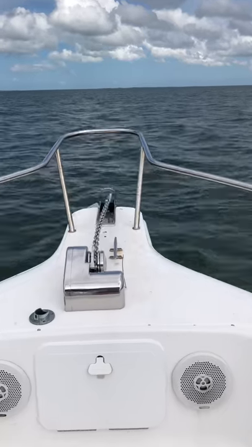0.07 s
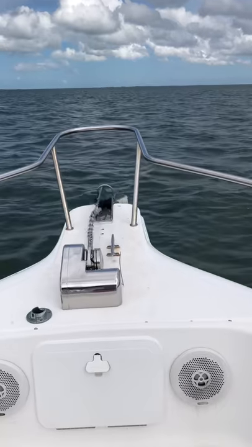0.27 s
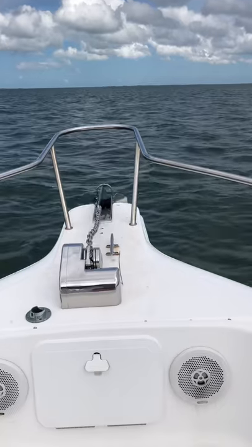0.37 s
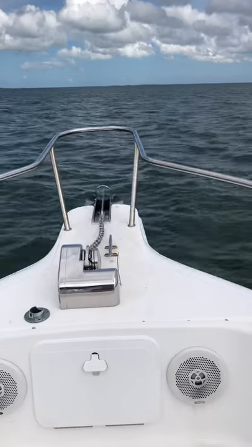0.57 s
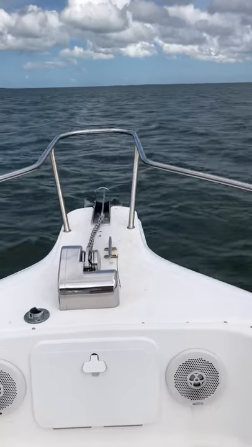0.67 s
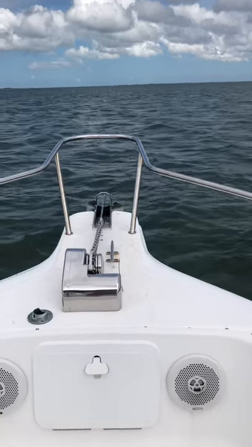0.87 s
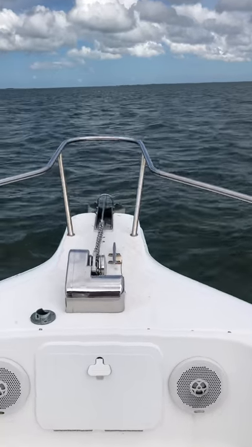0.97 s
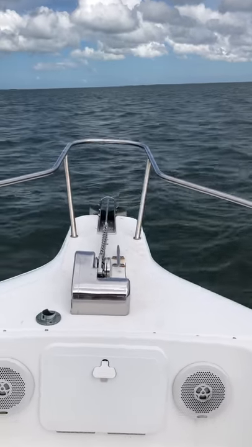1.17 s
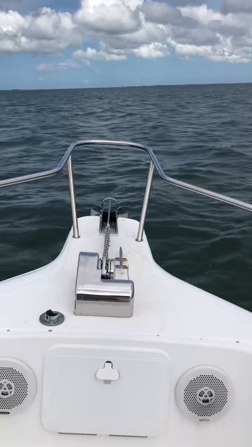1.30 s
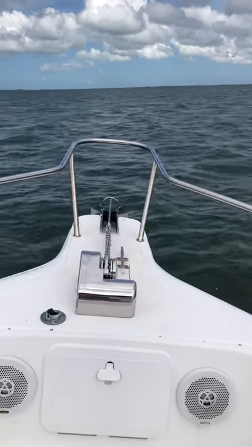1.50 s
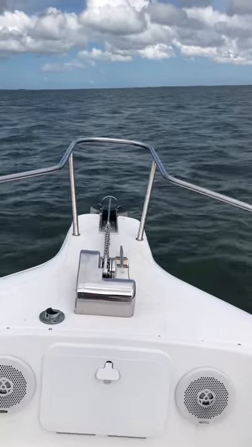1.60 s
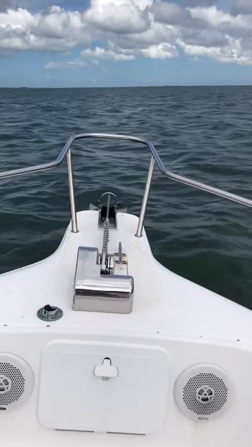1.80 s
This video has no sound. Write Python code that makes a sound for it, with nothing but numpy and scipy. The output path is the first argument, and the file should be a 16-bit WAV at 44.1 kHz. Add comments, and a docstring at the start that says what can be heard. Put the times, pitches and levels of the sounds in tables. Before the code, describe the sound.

An anchor clanks into a small boat's bow roller: its chain grinds and clinks, then it slams home, knocks again and rattles to rest, thudding through the hollow deck. Wind and sea rumble throughout, heard from behind the front deck.

```python
"""On a small boat on open water, an anchor is hauled into the roller at the bow.
Wind and sea rumble throughout. The chain grinds and clinks over the roller; the anchor slams home,
knocks again and rattles into its seat. Each blow clanks in the roller, rings in the anchor's steel
and thuds through the hollow deck, and the whole bow booms under the load."""
import sys
import numpy as np
from scipy import signal
from scipy.io import wavfile

SR = 44100
rng = np.random.default_rng(int(sys.argv[2]) if len(sys.argv) > 2 else 0)


def wav_record(signal):
    """Record a signal, one row per channel, as 16-bit PCM in the file named by sys.argv[1]."""
    frames = np.transpose(np.atleast_2d(signal))
    bounded = np.clip(frames, -1, 1)
    # unit amplitude maps onto the largest positive 16-bit level
    quanta = np.round(bounded * 32767).astype(np.int16)
    wavfile.write(sys.argv[1], SR, quanta)


N = 81585
TIME = np.arange(N) / SR

# blows of the anchor: start_s, clank_db, extra_treble_db, thud_db, ring_db
BLOWS = [(0.018, -35, 12.5, -23, -50), (0.0875, -17, -4, -22.5, -22.5), (0.2887, 4, 1, 3, -1),
         (0.323, -12.5, 10.5, -4, -32), (0.332, -19, 16, 3, -36), (0.365, -28, 16.5, -1, -30),
         (0.606, -30.5, 27, -48, -48), (0.6109, -0.5, 2, 0.5, -10.5), (0.620, -7, 4, -5.5, -41),
         (0.7477, -12.5, -15, -19, -59), (0.7982, -10.5, -12, -7, -28), (0.8365, -5, -3, -3, -14.5),
         (0.848, -8, -5, -17, -34), (0.8787, -5.5, -1, -4, -18), (0.8998, -5.5, -16, -18, -25),
         (0.921, -13.5, -8, -11, -21), (0.9998, -9.5, -4.5, -10, -35), (1.011, -23.5, 4, -26, -39),
         (1.691, -36, 9, -24, -55)]
# notes of the metal roller: pitch_hz, level_db, fade_s (time to die away by 60 dB)
ROLLER_NOTES = [(432, -21.5, 0.095), (647, -23.5, 0.18), (740, -16, 0.04), (917, -23.5, 0.16),
                (1020, -18.5, 0.12), (1158, -6, 0.011), (1220, -27.5, 0.098), (1273, -27, 0.24),
                (1450, -30, 0.032), (1595.5, -24, 0.09), (1725, -16, 0.035), (2506, -29, 0.062),
                (3080, -32, 0.11), (3270, -49, 0.072), (4050, -37, 0.052)]


def from_db(db):
    """Turn decibels into a gain."""
    return 10 ** (np.asarray(db) / 20)


def rms_one(x):
    """Scale a signal to an average power of 1."""
    return x / np.sqrt(np.mean(x ** 2) + 1e-20)


def in_time(rows):
    """Join (time, value) points with straight lines."""
    return np.interp(TIME, *np.transpose(rows))


def at_hz(rows, hz):
    """Read a table's columns at one pitch."""
    pitches, *columns = np.transpose(rows)
    return [np.interp(np.log(hz), np.log(pitches), column) for column in columns]


def drift(rate_hz):
    """A smooth random wander, about 1 in size."""
    r = np.exp(-2 * np.pi * rate_hz / SR)
    return rms_one(signal.lfilter([1], [1, -2 * r, r * r], rng.standard_normal(2 * N))[N:])


def clicks(start_s, level_db):
    """One click for each time and level."""
    out = np.zeros(N)
    np.add.at(out, np.clip(np.atleast_1d(start_s) * SR, 0, N - 1).astype(int), from_db(level_db))
    return out


def fade(x, fade_s):
    """Give each click a tail that drops 60 dB in fade_s."""
    return signal.lfilter([1], [1, -from_db(-60 / (fade_s * SR))], x + 1e-18)


def ring(x, hz, fade_s):
    """Each click starts a pure note that dies away."""
    r = from_db(-60 / (fade_s * SR))
    w = 2 * np.pi * hz / SR
    return signal.lfilter([0, np.sin(w)], [1, -2 * r * np.cos(w), r * r], x + 1e-18)


def tone(pitch_hz):
    """A pure tone that follows a changing pitch."""
    return np.sin(2 * np.pi * np.cumsum(pitch_hz) / SR)


def swell(peak_s, level_db, half_length_s):
    """A smooth rise and fall."""
    return from_db(level_db) * np.exp(-((TIME - peak_s) / half_length_s) ** 2 / 2)


def noise_bands(strength_at):
    """Noise in third-octave bands; strength_at(hz) gives each band's strength over time."""
    edges, out = 22 * 2 ** (np.arange(30) / 3), 0
    for low, high in zip(edges, edges[1:]):
        strength = np.pad(strength_at(np.sqrt(low * high)), (SR // 4, 0), "edge")
        band = signal.butter(2, [low, high], "band", fs=SR, output="sos")
        out = out + signal.sosfilt(band, strength * rng.standard_normal(len(strength)))[-N:]
    return out * np.sqrt(SR / 2)


def struck(notes, start_s, blow_db, scatter_db=3):
    """Every blow rings each of an object's notes with a slightly random strength."""
    out = 0
    for k, (hz, level_db, fade_s) in enumerate(notes):
        hits = clicks(start_s, blow_db + level_db + scatter_db * rng.standard_normal(len(start_s)))
        out = out + (-1) ** k * ring(hits, hz, fade_s)
    return out


def wind_and_sea():
    """Wind and water make a low, gently flickering rumble."""
    # tone of the rumble: pitch_hz, level_db_per_hz
    rumble = [(25, -43.5), (40, -58), (65, -52.5), (95, -50), (150, -56), (300, -60.5), (550, -68.5),
              (1000, -76), (2000, -87.5), (4000, -97), (8000, -105), (15000, -108)]
    # its rise and fall: time_s, level_db
    loudness = [(0, -2), (.5, -1.5), (1.1, -1), (1.4, -1.5), (1.85, -5)]
    level_db, flicker_db = in_time(loudness), 2.5
    return noise_bands(lambda hz: from_db(level_db + at_hz(rumble, hz)[0] + flicker_db * drift(11.4)))


def chain_grind(contacts_per_s=700, contact_s=0.0045, spread_db=3):
    """Many tiny contacts of the chain grind over the roller and set it ringing."""
    # loudness of the running chain: time_s, level_db
    hauling = [(0, -16), (.08, -31.5), (.12, -12.5), (.17, -1), (.25, 0), (.3, -0.5), (.37, -7), (.42, -8),
               (.46, -25), (.58, -21), (.72, -26.5), (.78, -17.5), (.84, 2), (.872, -9), (.93, -2.5),
               (.955, -17), (1.0, -29), (1.1, -45), (1.85, -35)]
    # tone of the grinding: pitch_hz, level_db_per_hz
    grinding = [(150, -48.5), (430, -59.5), (560, -59.5), (900, -53.5), (1450, -67), (2000, -62.5),
                (2700, -67), (4000, -74.5), (7000, -92.5), (16000, -106)]
    haul = from_db(in_time(hauling))
    sizes = from_db(spread_db * np.minimum(rng.exponential(1, N), 4))
    contacts = sizes * (rng.random(N) < contacts_per_s / SR)
    knocks = haul * contacts * rng.choice([-1, 1], N)
    roughness = haul * rms_one(np.sqrt(fade(contacts ** 2, contact_s * np.log(1000) / 2)))
    grind = noise_bands(lambda hz: from_db(at_hz(grinding, hz)[0]) * roughness)
    ringing = sum((-1) ** k * from_db(level_db) * ring(knocks, hz, fade_s)
                  for k, (hz, level_db, fade_s) in enumerate(ROLLER_NOTES))
    return grind + from_db(-31) * ringing


def roller_clank(crack_db=-2, crack_s=0.003, treble_hz=2940):
    """Each blow cracks at first contact, leaves a dense rattle and rings the roller."""
    # the rattle: pitch_hz, level_db_per_hz, fade_s
    rattle = [(30, -84, .15), (90, -79, 0.089), (216, -42.5, 0.39), (405, -46, 0.11), (516, -53, 0.28),
              (1040, -48, 0.13), (1620, -48, 0.079), (2130, -67.5, 0.18), (3280, -59, 0.091),
              (5430, -66.5, 0.039), (7920, -73.5, 0.11), (10100, -95, 0.15), (16000, -97, .12)]
    start_s, clank_db, treble_db, _, _ = np.transpose(BLOWS)

    def crack_and_rattle(hz):
        """How one band of noise dies away."""
        level_db, fade_s = at_hz(rattle, hz)
        power = clicks(start_s, clank_db + treble_db / (1 + (treble_hz / hz) ** 2)) ** 2
        crack = from_db(crack_db) ** 2 * fade(power, crack_s * np.log(1000) / 2)
        return from_db(level_db) * np.sqrt(crack + fade(power, fade_s / 2))

    return noise_bands(crack_and_rattle) + struck(ROLLER_NOTES, start_s, clank_db)


def anchor_ring():
    """The anchor's steel rings after each blow."""
    # notes of the steel: pitch_hz, level_db, fade_s
    steel_notes = [(888, -16, .33), (1916, -25, .27), (2023, -19, .3), (593, -35, .3), (1222, -23, .19),
                   (2065, -32, .17), (3187, -37, .34), (3758, -46, .28), (5050, -50, .28), (6040, -50, .38),
                   (6918, -54, .22), (8995, -59, .55), (12900, -61, .3)]
    start_s, _, _, _, ring_db = np.transpose(BLOWS)
    return struck(steel_notes, start_s, ring_db)


def deck_thud(start_hz=405, end_hz=121.2, fall_s=0.00825, rise_s=0.013):
    """The deck thumps and hums. The thump falls in pitch, since slow bending waves arrive last."""
    # notes of the hollow deck: pitch_hz, level_db, fade_s
    deck_notes = [(136.2, -25, 0.58), (154, -18, 0.1), (170.7, -21.5, 0.34), (194, -25.5, 0.11),
                  (243.5, -17.5, 0.18), (267.5, -24, 0.48), (353, -28, 0.36)]
    start_s, _, _, thud_db, _ = np.transpose(BLOWS)
    age = TIME[:SR // 5]
    pitch_hz = end_hz + (start_hz - end_hz) * np.exp(-age / fall_s)
    loudness = from_db(-8) * (age / rise_s * np.exp(1 - age / rise_s)) ** 2
    thumps = signal.fftconvolve(clicks(start_s, thud_db), loudness * tone(pitch_hz))[:N]
    return thumps + struck(deck_notes, start_s, thud_db)


def link_clinks(tick_fade_s=0.053, tick_rise_s=0.0036, tick_low_hz=4170):
    """Each link that snaps straight gives a bright tick and a short high note."""
    # single links: start_s, note_db, pitch_hz, fade_s, tick_db
    clinks = [(0.087, -35.5, 2570, .05, -50.5), (0.137, -40.5, 8140, 0.057, -37),
              (0.224, -48, 12500, .06, -39), (0.237, -39, 8200, 0.12, -30), (0.269, -48, 12400, 0.17, -45),
              (.29, -54, 12900, .08, -47), (.365, -38, 4970, 0.06, -54), (.402, -27, 2570, .06, -43.5),
              (.420, -50, 8680, 0.16, -58), (.423, -52, 12350, .07, -58), (0.75, -28.5, 2460, 0.034, -49),
              (.838, -50, 12600, 0.057, -43), (0.926, -26, 2300, 0.047, -47)]
    start_s, _, _, _, tick_db = np.transpose(clinks)
    snaps = clicks(start_s, tick_db)
    ticks = rng.standard_normal(N) * (fade(snaps, tick_fade_s) - fade(snaps, tick_rise_s))
    notes = sum(ring(clicks(at_s, note_db), hz, fade_s) for at_s, note_db, hz, fade_s, _ in clinks)
    return notes + signal.sosfilt(signal.butter(2, tick_low_hz, "high", fs=SR, output="sos"), ticks)


def roller_groan(pitch_hz=420.7):
    """The loaded roller gives one short, wavering groan."""
    loudness = swell(peak_s=0.261, level_db=-22.5, half_length_s=0.027)
    return loudness * tone(pitch_hz * (1 + 0.031 * drift(64)))


def bow_boom(pitch_hz=66.36):
    """The whole bow booms as the anchor loads it."""
    # deep swells: peak_s, level_db, half_length_s
    booms = [(0.28, -28, 0.0062), (0.335, -7.5, 0.013), (0.459, -19.5, 0.023), (0.676, -20, 0.03),
             (0.89, -21, 0.083)]
    return sum(swell(*row) for row in booms) * tone(pitch_hz * (1 + 0.088 * drift(20)))


def scene():
    """Everything together, as heard from behind the front deck."""
    blows = roller_clank() + anchor_ring() + deck_thud()
    return (wind_and_sea() + chain_grind() + blows + link_clinks() + roller_groan() + bow_boom())[None]


def record(dry, low_hz=39, high_hz=16000):
    """The microphone drops the deepest bass, rounds off the peaks and cuts the highest treble."""
    dry = signal.sosfilt(signal.butter(6, low_hz, "high", fs=SR, output="sos"), dry)
    rounded = dry / (1 + dry ** 6) ** (1 / 6)
    return signal.sosfilt(signal.ellip(10, .1, 90, high_hz, fs=SR, output="sos"), rounded)


dry = scene()
out = record(dry)
wav_record(out)
```